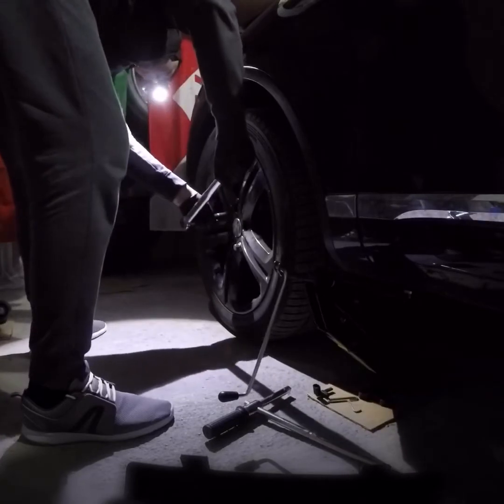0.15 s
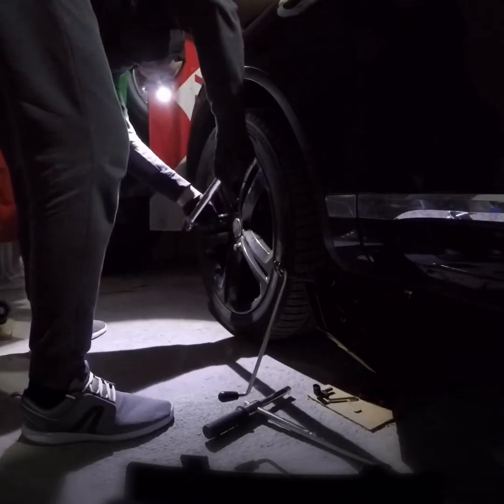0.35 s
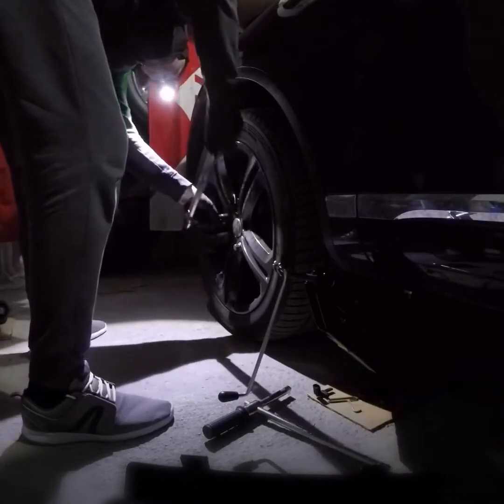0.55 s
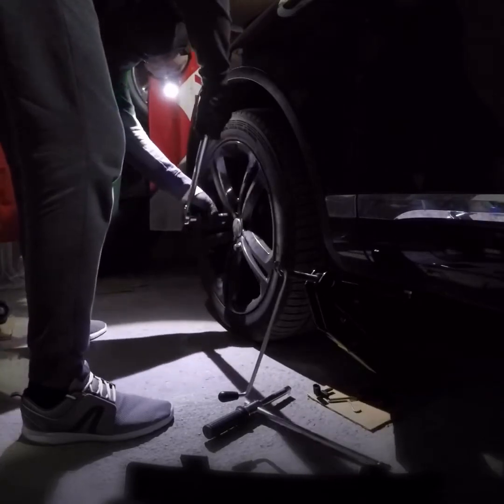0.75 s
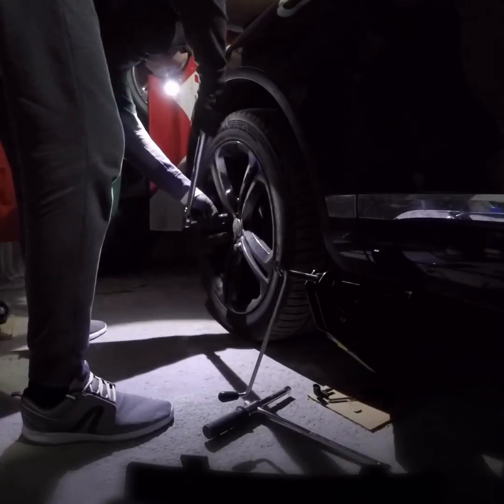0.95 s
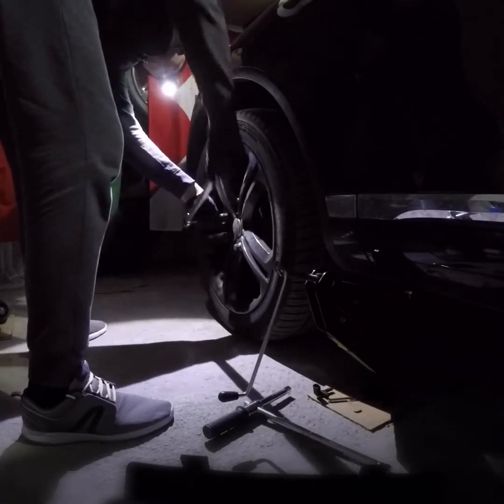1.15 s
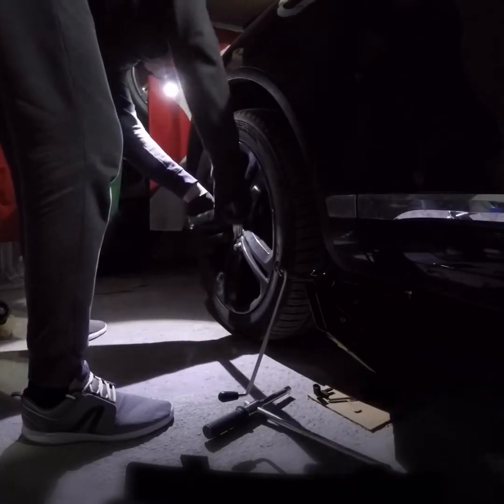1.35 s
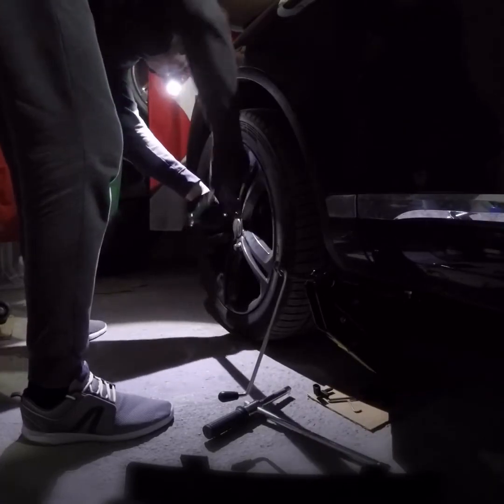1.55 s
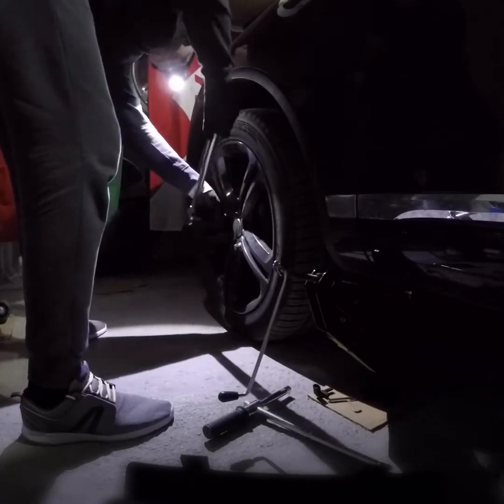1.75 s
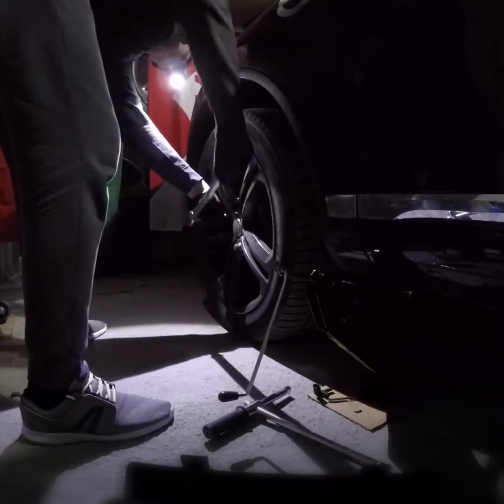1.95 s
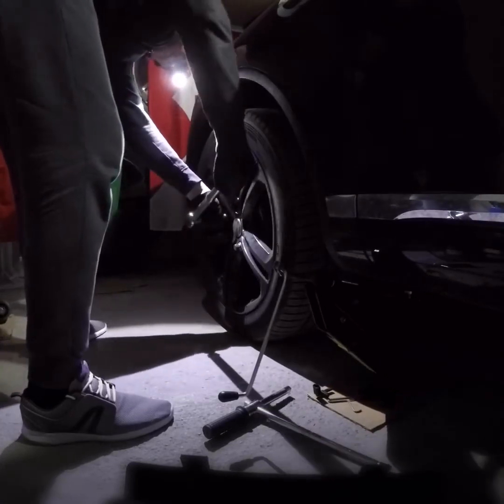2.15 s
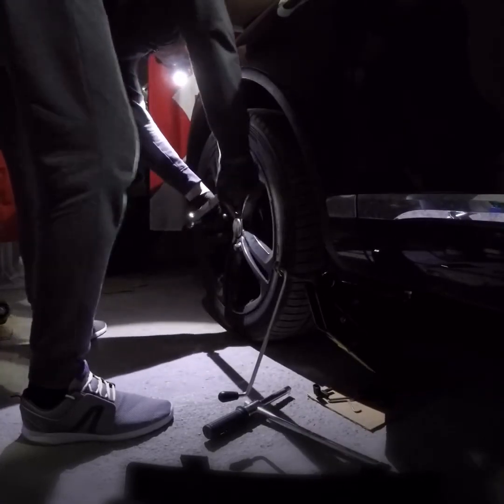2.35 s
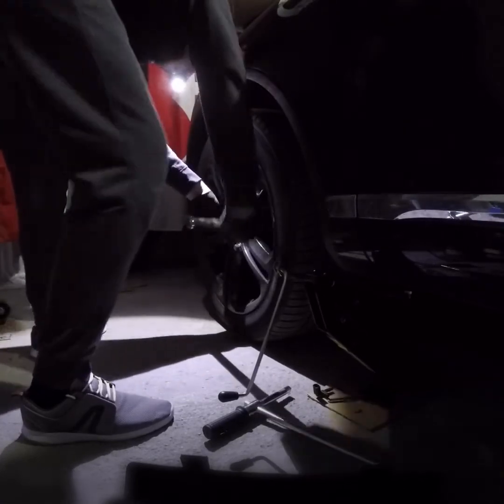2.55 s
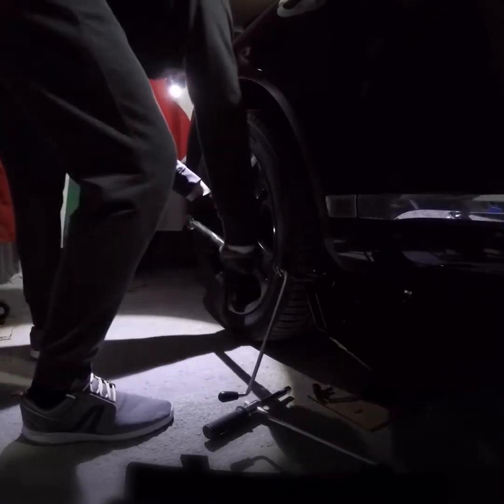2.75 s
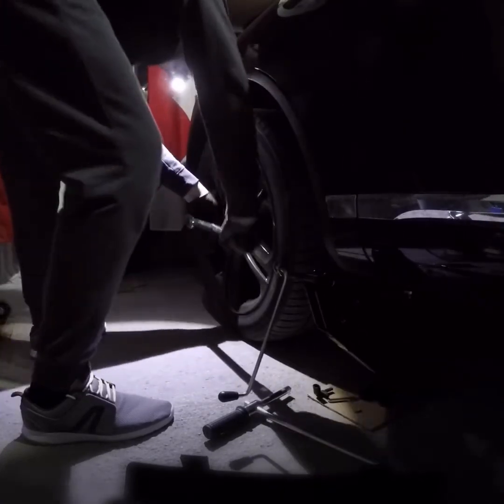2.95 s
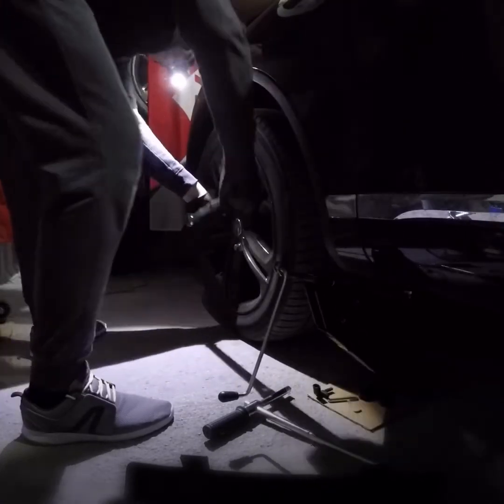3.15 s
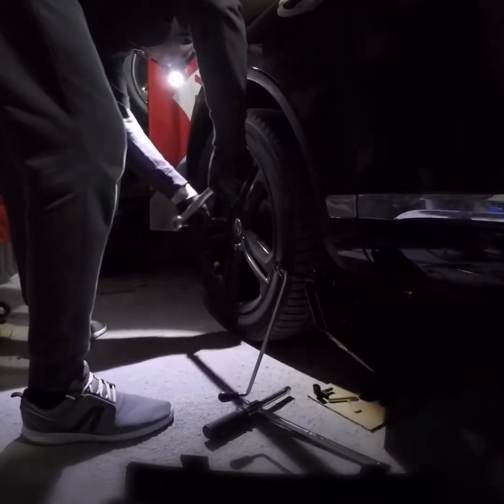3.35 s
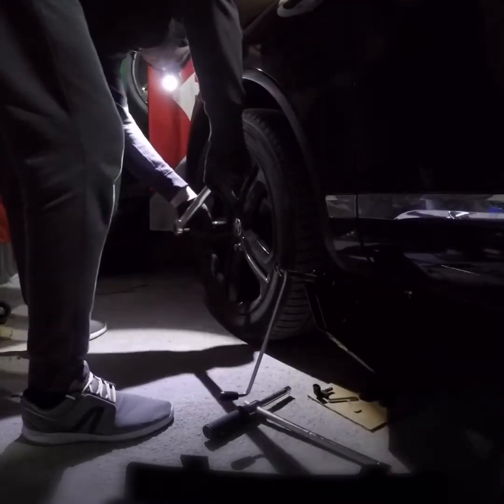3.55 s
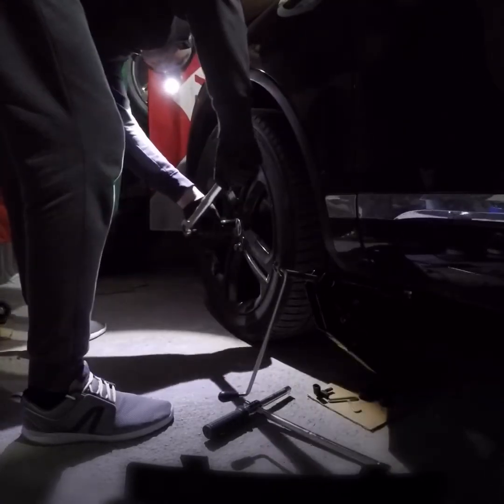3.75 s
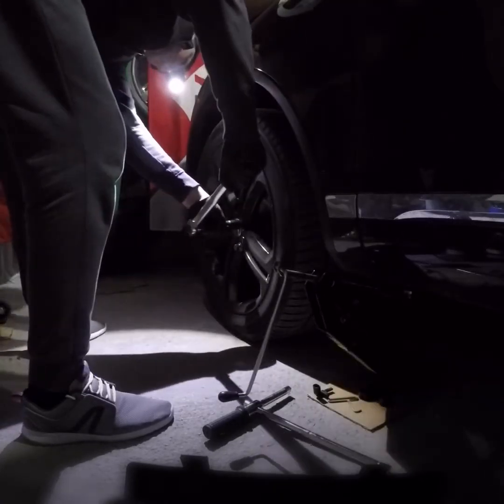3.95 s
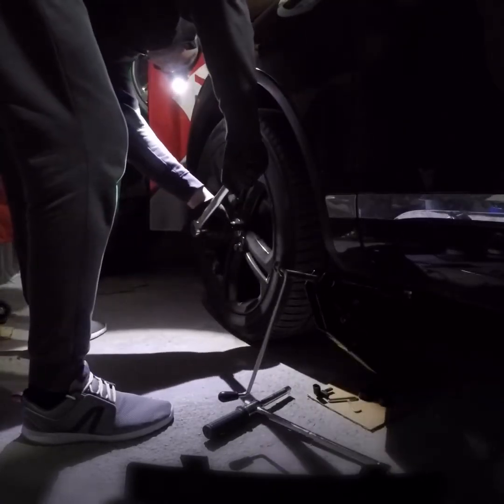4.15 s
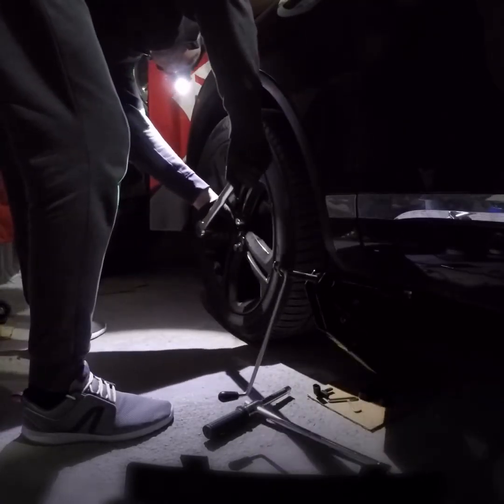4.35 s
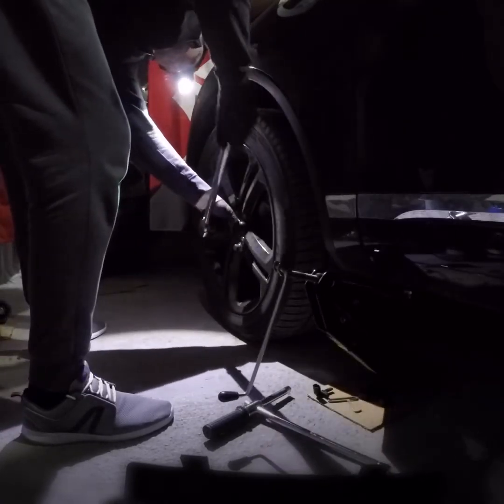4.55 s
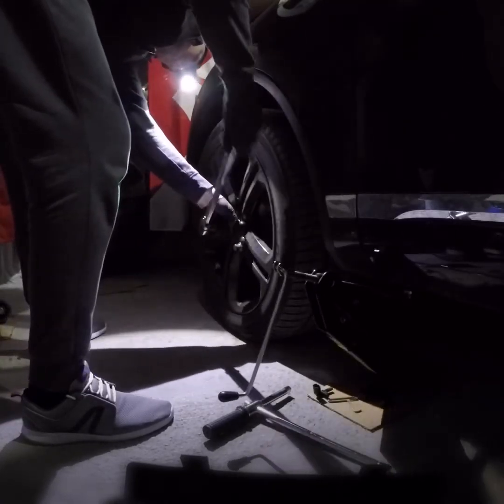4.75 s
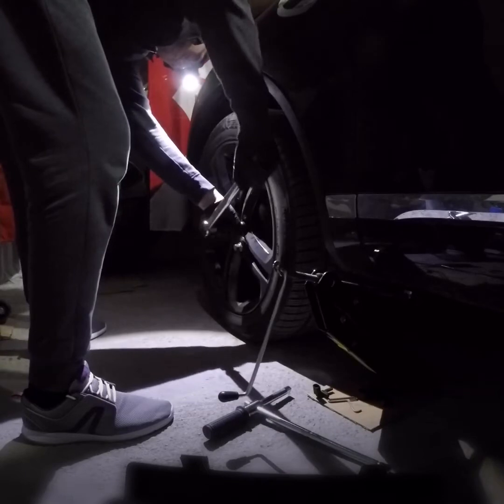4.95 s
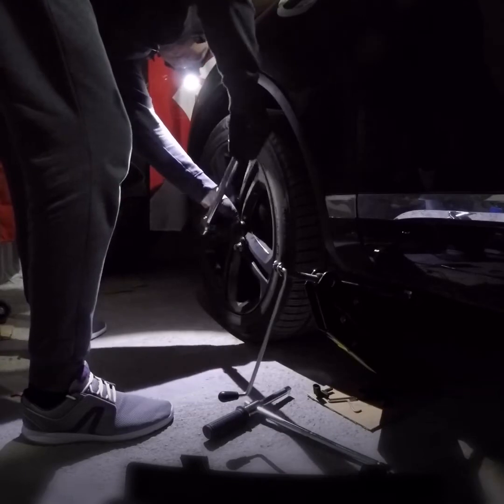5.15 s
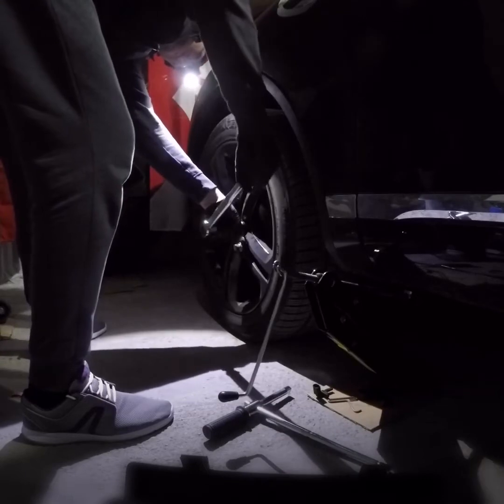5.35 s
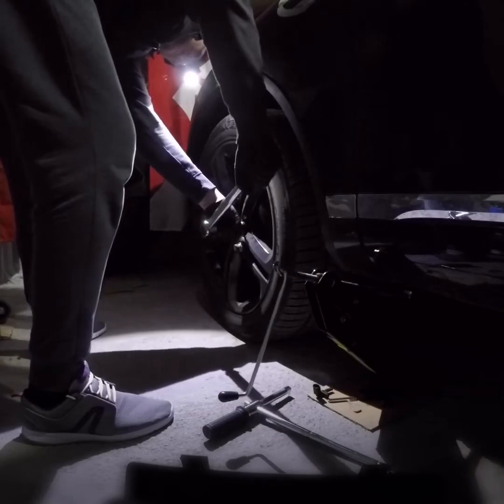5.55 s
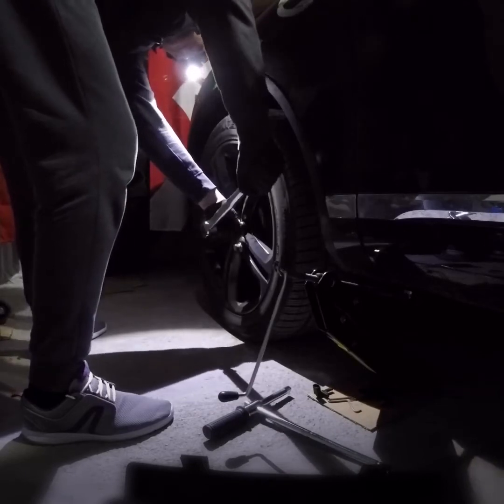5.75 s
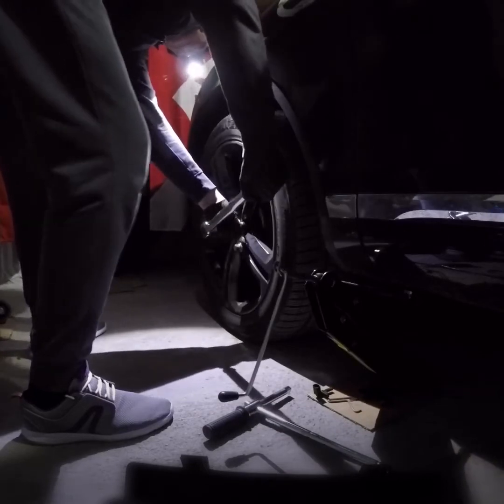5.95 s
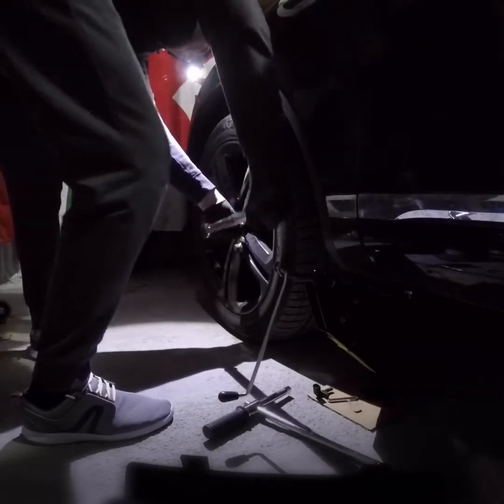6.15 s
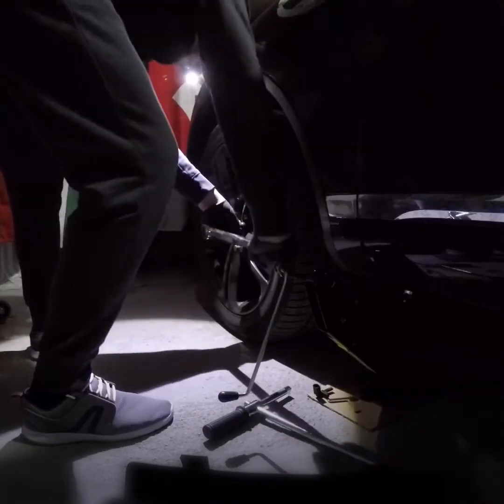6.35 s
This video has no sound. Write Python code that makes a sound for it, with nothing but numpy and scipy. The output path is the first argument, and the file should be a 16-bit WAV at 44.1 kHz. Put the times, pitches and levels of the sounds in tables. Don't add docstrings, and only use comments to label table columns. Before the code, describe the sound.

Steel socket rattles and scrapes on a car wheel bolt; a click-type wrench snaps loudly, springs back, then snaps again over faint hiss.

```python
import sys
import numpy as np
from scipy import signal
from scipy.fft import rfft, irfft
from scipy.io import wavfile
from scipy.ndimage import uniform_filter1d

SR = 44100
rng = np.random.default_rng(int(sys.argv[2]) if len(sys.argv) > 2 else 0)


def log_audio(samples):
    frames = np.atleast_2d(samples).T
    limited = np.clip(frames, -1, 1)
    pcm = np.round(limited * 32767).astype(np.int16)
    wavfile.write(sys.argv[1], SR, pcm)


def field_ratio(decibels):
    return 10 ** (np.asarray(decibels, dtype=float) / 20)


N = 281799
T = np.arange(N) / SR

# (frequency [Hz], density [dB per Hz])
HISS_COLOUR = [(12, -51), (20, 7), (49, -1.5), (185, -15), (700, -22), (4310, -25.5), (11000, -35),
               (15500, -35)]
# (time [s], low tone [dB], high whine [dB])
MACHINE = [
    (0, -86, -78.5),
    (.7, -88.5, -77),
    (2.3, -86, -75.5),
    (3.5, -85, -74),
    (3.9, -105, -80),
    (6.39, -96, -91),
]
# (time [s], socket pressed on the bolt [dB], grip sliding on the tube [dB])
HANDLING = [(0.0, -83, -80), (1.05, -84, -78), (1.47, -78, -73), (1.81, -73.5, -72.5), (2.2, -82, -77),
            (2.7, -80, -76), (3.1, -71, -84), (3.2, -67.5, -74), (3.35, -70.5, -70.5), (4.0, -72, -73),
            (4.6, -72, -73.5), (5.11, -69.5, -70.5), (5.57, -77, -81), (5.84, -72.5, -74),
            (6.1, -77.5, -77), (6.39, -71, -78)]
# (frequency [Hz], width [Hz], level [dB])
SCRAPE = [
    [(1830, 130, -4.5), (3004, 200, 16)],
    [(4170, 580, 4.5), (4270, 120, -42), (6370, 100, -10)],
]
# (from [s], to [s])
LOADED = [
    (1.5, 2.0),
    (2.8, 3.75),
    (4.45, 6.3),
]
# (time [s], socket [dB], tube [dB])
AFTER_RINGS = [
    (2.62, -54.5, -50.5),
    (2.83, -61, -55.5),
    (6.2, -58.5, -51),
]

# (time [s], peak [dB], low modes [dB], bright modes [dB], sizzle [dB])
RATTLE_BLOWS = [(0.3501, -55.5, 1, 2, 0), (0.365, -57.5, 2.5, 2, 3), (1.1812, -51, -3, -1, 5),
                (1.195, -55, -14, -8, 0), (1.7146, -54.5, -2, -3, 0), (2.6265, -33, -3, 9.5, 4),
                (3.8502, -60, 13, -2, 2), (4.625, -55, -1, 5, 0), (4.9626, -50, -0.5, -2, -6),
                (5.0377, -49.5, -1, 0, -4), (5.1288, -54, -11, -10, -7), (5.4803, -60, 5.5, -2, 4)]
SEAT_BLOWS = [
    (0.6672, -55, -4, -14, 2),
    (3.0965, -44, 1.5, 6, 8.5),
    (3.106, -44, -3, -3, -2),
    (3.1651, -44.5, -1.5, 0, -8),
    (4.2754, -46.5, 5, 1, 3),
    (4.2856, -47, 0.5, -15, -2),
]
PAWL_BLOWS = [
    (1.4624, -43.5, 0, 1, -5),
    (1.4782, -47.5, 0.5, -14, -14),
    (2.8170, -40, 2, -4, 7),
    (2.8196, -27, -6, -5.5, -7.5),
    (2.8305, -36.5, 4, -2.5, -3),
]
KNOCK_BLOWS = [
    (1.5887, -41.5, -2.5, 1, 9),
    (1.6045, -63, -4, -4, 5),
    (4.5142, -43, 6, 1, 1.5),
    (4.5305, -63, 3, -9, -2),
    (5.0137, -48, 2, 1, -1),
]
BREAK_BLOWS = [
    (2.5920, -20, -0.5, -1.1, 0.061),
    (6.1805, -18, -2.5, 0.085, 1),
]
# (delay [s], level [dB], low modes [dB], bright modes [dB], sizzle [dB])
BREAK_STEPS = [
    (-.0025, -16, 17, 4, 7),
    (0, 1, -1, 2.5, 2.5),
    (.0066, -9.5, 5, -3, 13),
    (.0121, -5, 3, -1.5, -18),
]

# (frequency [Hz], spread [Hz], level [dB], t60 [s])
TUBE = [(1500, 150, -16, .03), (1860, 80, -8, .04), (2300, 150, -10, .04), (2750, 120, -9, .04),
        (3050, 80, -11, .08), (6720, 120, -7, .06), (7050, 110, -3, .06), (6930, 200, -12.5, .34),
        (11000, 300, -12, .03), (3900, 110, -11, .04), (4160, 50, 0, .085), (4230, 190, -14.5, .38),
        (4400, 100, -10, .08), (4700, 60, -20, .06)]
SOCKET = [(1435, 130, 4, 0.09), (1770, 35, 20, 0.019), (2150, 29, -5.5, 0.069), (2700, 210, -23, 0.11),
          (2880, 100, -24, 0.26), (4420, 240, -3, 0.083), (4430, 36, -15, 0.1), (7040, 130, -14, 0.14),
          (6680, 240, 3, 0.031)]
PAWL = [(1120, 16, -14, 0.12), (1770, 157, 1.5, 0.022), (2050, 130, -7, 0.047), (2860, 91, 4, 0.14),
        (3124, 16, -4.5, 0.15), (4130, 150, 0, 0.14), (4420, 79, 9.5, 0.033), (4600, 91, -13, 0.11),
        (5600, 350, -7, .03), (6550, 180, -13, 0.044), (6760, 122, 1, 0.058), (9600, 170, -3, 0.049)]
BOLT = [(1880, 60, -2.5, 0.042), (2210, 73, -2, 0.054), (2812, 114, 9.5, 0.14), (3210, 140, -12, 0.15),
        (4140, 62, 0, 0.086), (4730, 69, 1, 0.093), (6160, 100, 7.5, 0.015), (9500, 29, -8, 0.16)]
WHEEL = [(1142, 5, -25, 0.047)]
# (low edge [Hz], high edge [Hz])
MODE_BANDS = [(3600, 5200), (1100, 2400), (2400, 3300), (5200, 7600), (7600, 15200)]
# (lowest [dB], low [dB], bright [dB], brightest [dB])
RATTLE_COLOUR = (-10.5, -4.5, -9.5, -18)
SEAT_COLOUR = (-11.5, -0.5, -5.5, -18.5)
PAWL_COLOUR = (-4, 0.5, -2, -5.5)
KNOCK_COLOUR = (-4.5, -4, -6.5, -17)
BREAK_COLOUR = (-12, -7, -2, -9)
# (frequency [Hz], t60 [s])
ROOM = [(500, 0.37), (2000, 0.32), (4000, 0.24), (7000, 0.15), (12000, 0.22)]


def level(x, db):
    return x * field_ratio(db) / np.sqrt(np.mean(x ** 2))


def curves(table):
    s, *columns = np.transpose(table)
    return [np.interp(T, s, column) for column in columns]


def over_pitch(hz, table):
    table_hz, value = np.transpose(table)
    return np.interp(np.log(hz), np.log(table_hz), value)


def band(x, lo_hz, hi_hz, order=2):
    sos = signal.butter(order, [lo_hz, min(hi_hz, .49 * SR)], "bandpass", fs=SR, output="sos")
    return signal.sosfilt(sos, x)


def walk(rate_hz):
    hold = int(SR / rate_hz)
    steps = np.repeat(rng.standard_normal(N // hold + 1), hold)
    return 1.255 * uniform_filter1d(steps, hold)[:N]


def hiss():
    hz = np.maximum(np.arange(N // 2 + 1) * SR / N, 1)
    spectrum = rfft(rng.standard_normal(N)) * field_ratio(over_pitch(hz, HISS_COLOUR))
    return level(irfft(spectrum, N), -61.5)


def machine():
    tone_db, whine_db = curves(MACHINE)
    tone_hz = 715 + 6 * walk(9.9)
    tone = np.sqrt(2) * np.sin(2 * np.pi * np.cumsum(tone_hz) / SR) * field_ratio(4.1 * walk(12))
    whine = level(band(rng.standard_normal(N), 2035, 2095, order=1), 0)
    return tone * field_ratio(tone_db) + whine * field_ratio(whine_db)


def camera():
    frame_s, first_tick_s = .033362, .0084
    load = np.clip(3 * np.cos(2 * np.pi * (T - .14) / 1.97), -1, 1)
    whistle_hz = 15030 + 35 * T + 100 * load
    frame, left = np.divmod(first_tick_s - T, -frame_s)
    left = frame_s + left
    draws = rng.standard_normal((4, int(frame.max()) + 2))
    jitter, busy, length, size = draws[:, frame.astype(int) + 1]
    reading = (left < .014 + .0025 * length) & (busy < .8)
    on = uniform_filter1d(reading * 1., 130)
    whistle = on * np.sin(2 * np.pi * np.cumsum(whistle_hz + 50 * jitter + 40 * walk(200)) / SR)
    tick_shape = np.exp(-((frame_s - left - .001) / 0.00034) ** 2)
    tick = tick_shape * np.sin(2 * np.pi * 14900 * left) * field_ratio(1.5 * size)
    sag = np.cos(2 * np.pi * 30.0 * (T - .019))
    return field_ratio(-66) * whistle + field_ratio(-60.5) * tick + field_ratio(-72.5) * sag


def handling():
    force = field_ratio(curves(HANDLING))
    for s, *db in AFTER_RINGS:
        after = np.maximum(T - s, 0)
        swell = np.minimum(after / 0.035, 1) * field_ratio(-60 * after / 0.69)
        force = force + field_ratio(db)[:, None] * swell
    slips = rng.standard_normal(N) * field_ratio(1.5 * walk(30) + 2.5 * walk(300))
    loaded = sum((T > start) * (T < end) for start, end in LOADED)
    loaded = uniform_filter1d(loaded + 0.089, SR // 10)
    wheel_hz = 1130
    wheel_hum = level(band(slips, wheel_hz - 12, wheel_hz + 12, order=1), -10)
    out = wheel_hum * force[0] * loaded
    for resonances, gain in zip(SCRAPE, force):
        ring = np.zeros(N)
        for hz, width, db in resonances:
            ring += level(band(slips, hz - width / 2, hz + width / 2, order=1), db)
        out = out + level(ring, -2.0) * gain
    return out


def blows(table, clusters, colour_db, click_db, grit_db, grit_s, thump_db, out_of_step=1):
    count = 11
    hz, spread_hz, db, t60 = np.repeat(clusters, count, axis=0).T[:, :, None]
    place = np.tile(np.linspace(-1.5, 1.5, count), len(clusters))[:, None]
    hz = hz + spread_hz * (place + 0.251 * rng.standard_normal(hz.shape))
    db = db - 2.5 * place ** 2
    out, t = np.zeros(N + SR), T[:SR // 4]
    for s, peak_db, low_db, bright_db, sizzle_db in table:
        rel_db = np.add(colour_db, [low_db, low_db, bright_db, sizzle_db])
        gain, phase = rng.standard_normal((2, len(hz), 1))
        wave = np.sin(2 * np.pi * hz * t + out_of_step * phase)
        body = np.sum(field_ratio(db + 3.2 * gain) * wave * field_ratio(-60 * t / t60), axis=0)
        grit = rng.standard_normal(len(t)) * np.exp(-t / grit_s)
        click = np.arange(len(t)) == 20
        contact = band(field_ratio(grit_db) * grit + field_ratio(click_db) * click, 2000, 9000, order=1)
        onset = 1 - np.exp(-t / .0004)
        hit = (body / np.abs(body).max() + contact) * onset
        parts = [(band(hit, lo, hi, order=3), above) for (lo, hi), above in zip(MODE_BANDS, [0, *rel_db])]
        parts.append((band(grit, 99, 1270, order=1), thump_db))
        start = int(s * SR)
        for part, above_db in parts:
            out[start:start + len(t)] += part * field_ratio(peak_db + above_db) / np.abs(part).max()
    return out[:N]


def rattles():
    held_tube = np.multiply(TUBE, [1, 1, 1, .85])
    return blows(RATTLE_BLOWS, held_tube, RATTLE_COLOUR, -19, -10.5, 0.022, -35, out_of_step=3.2)


def socket_seating():
    return blows(SEAT_BLOWS, SOCKET, SEAT_COLOUR, -36, -24.5, 0.012, -19, out_of_step=1.74)


def pawl_blows():
    return blows(PAWL_BLOWS, PAWL, PAWL_COLOUR, 1.2, -14.5, 0.01, -24)


def bolt_knocks():
    return blows(KNOCK_BLOWS, BOLT, KNOCK_COLOUR, -13, -10.5, 0.018, -30, out_of_step=1.54)


def break_overs():
    strikes = [np.add(blow, step) for blow in BREAK_BLOWS for step in BREAK_STEPS]
    return blows(strikes, [*TUBE, *WHEEL], BREAK_COLOUR, 0.7, -8.0, 0.0027, -26.5)


def garage(x):
    t, tail = T[:SR // 2], 0
    for hz in 350 * 2 ** np.arange(0, 5.6, .5):
        noise = band(rng.standard_normal(len(t)), hz / 1.19, hz * 1.19)
        tail = tail + noise * field_ratio(-60 * t / over_pitch(hz, ROOM))
    tail = tail * np.clip((t - .004) / .004, 0, 1)
    return signal.fftconvolve(x, tail / np.sqrt(np.sum(tail ** 2)))[:N]


def scene():
    bed = hiss() + machine() + camera()
    tool = rattles() + socket_seating() + pawl_blows() + bolt_knocks() + break_overs()
    return (bed + handling() + tool + field_ratio(-8.0) * garage(tool))[None]


def low_pass(x):
    return signal.sosfilt(signal.butter(12, 16450, fs=SR, output="sos"), x)


def record(dry):
    cut = signal.sosfilt(signal.ellip(8, .3, 22, 15240, fs=SR, output="sos"), dry)
    cut = signal.sosfilt(signal.butter(16, 15500, fs=SR, output="sos"), cut)
    return low_pass(cut)


dry = scene()
out = record(dry)
log_audio(out)
```